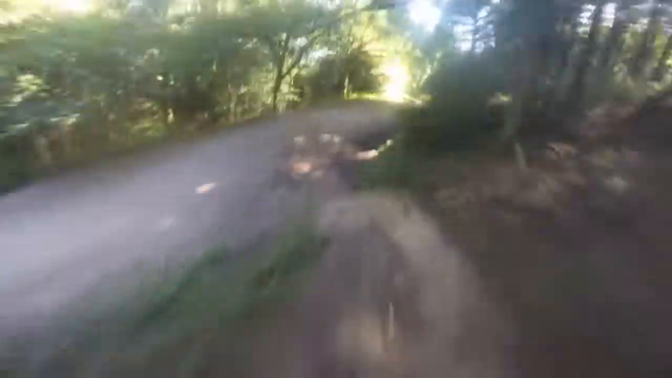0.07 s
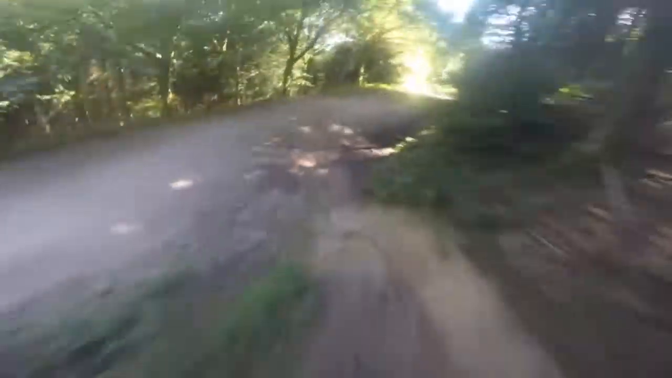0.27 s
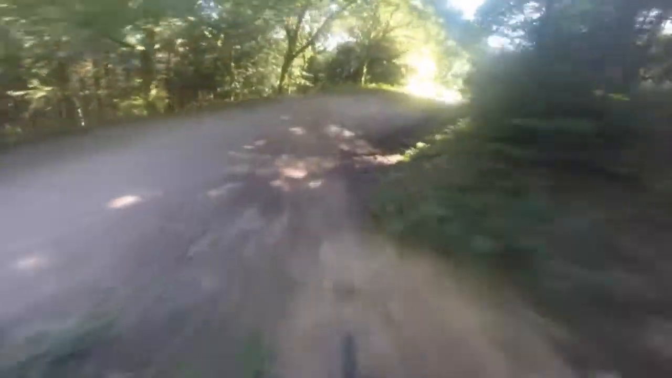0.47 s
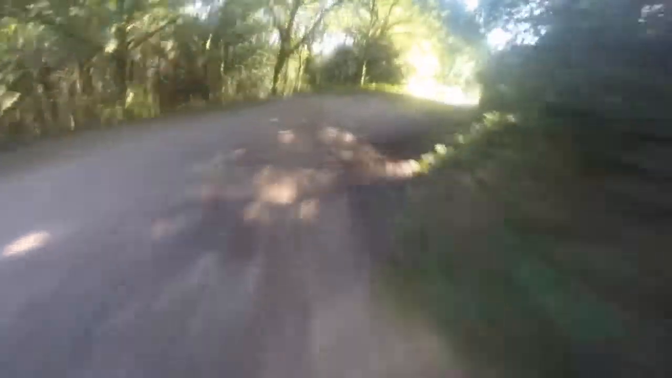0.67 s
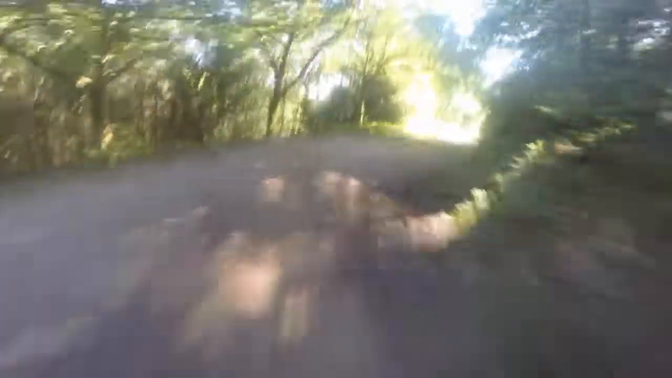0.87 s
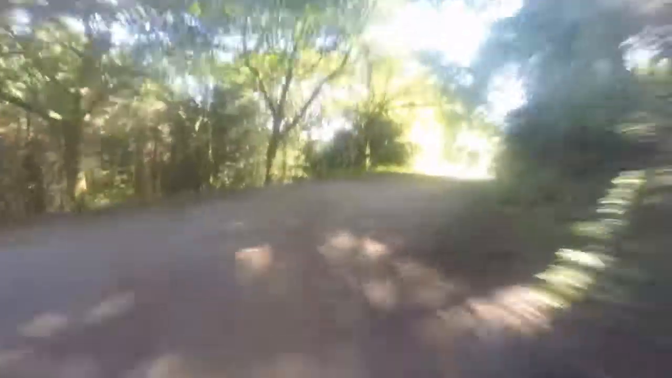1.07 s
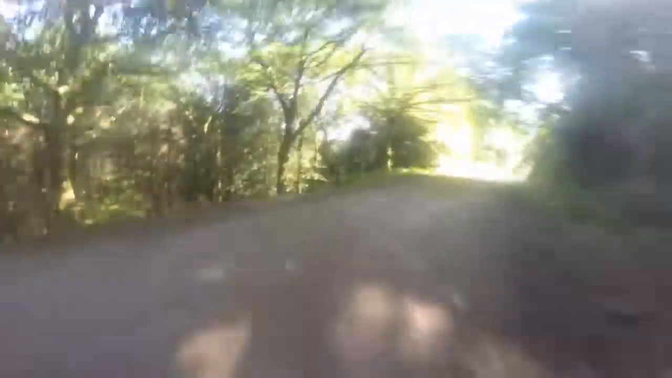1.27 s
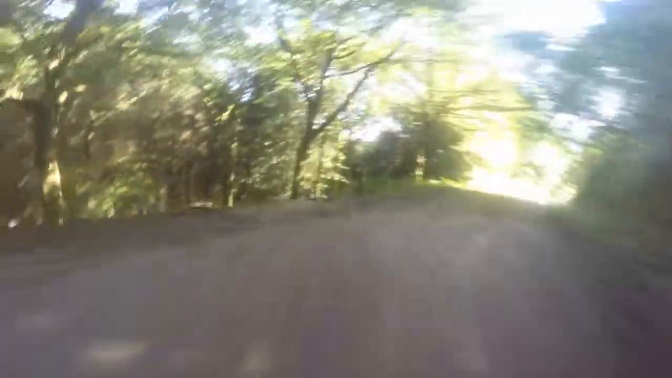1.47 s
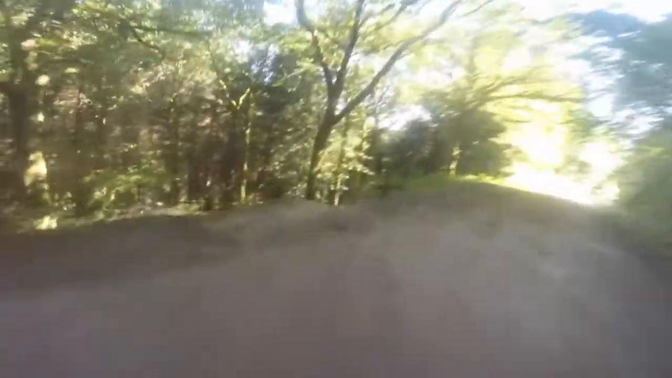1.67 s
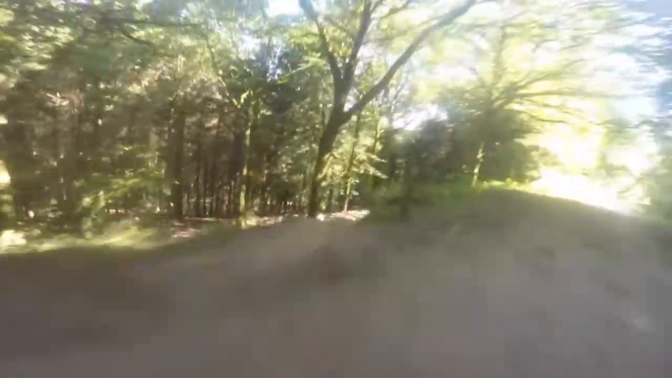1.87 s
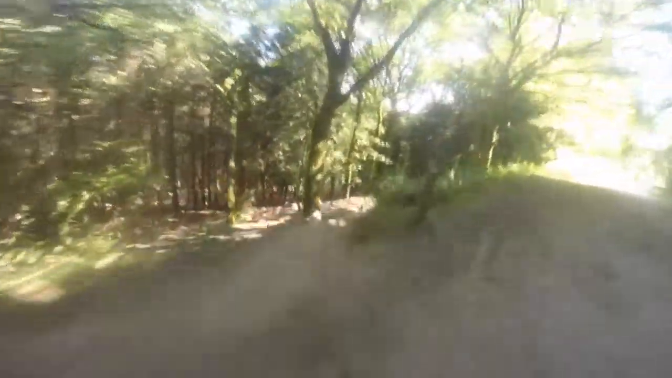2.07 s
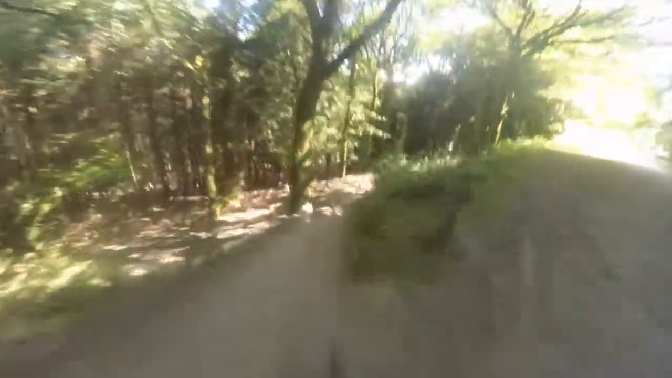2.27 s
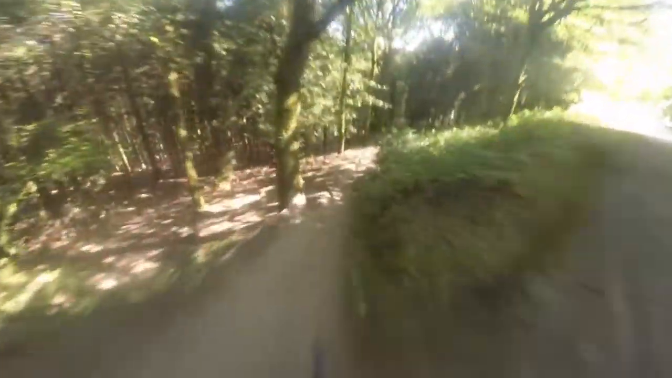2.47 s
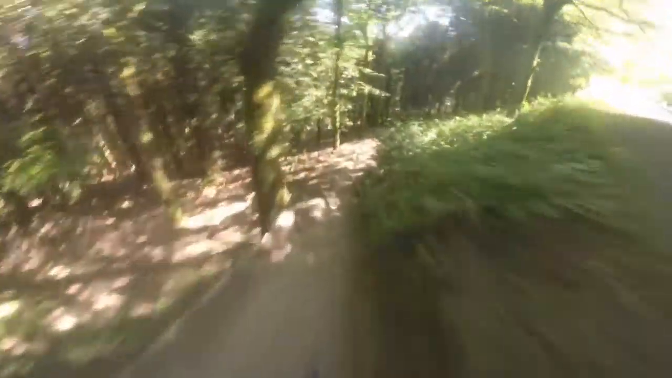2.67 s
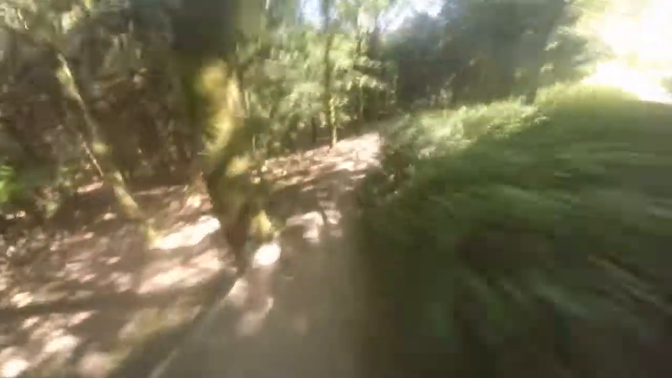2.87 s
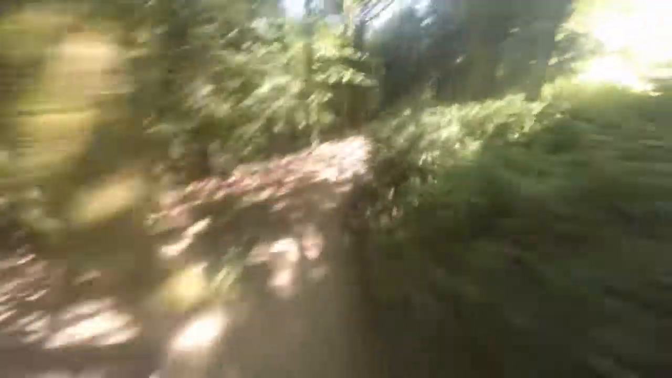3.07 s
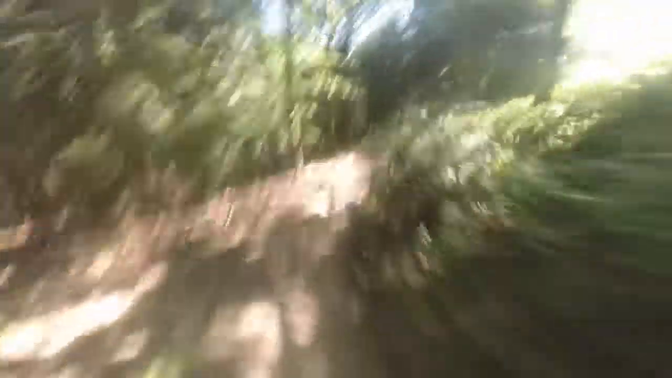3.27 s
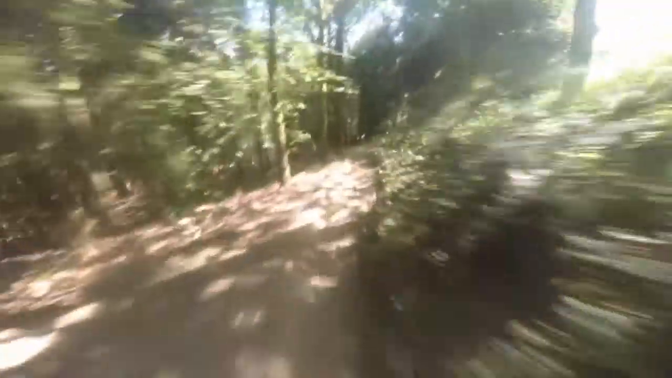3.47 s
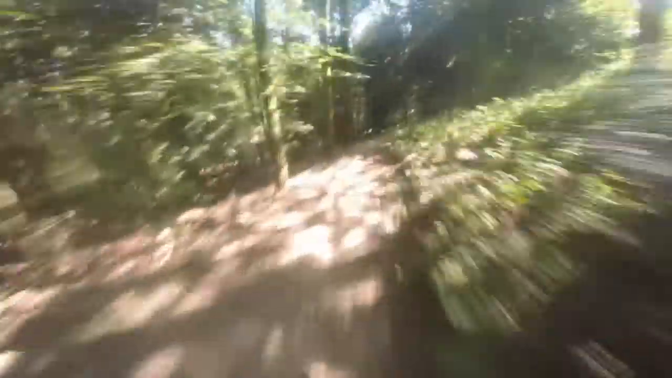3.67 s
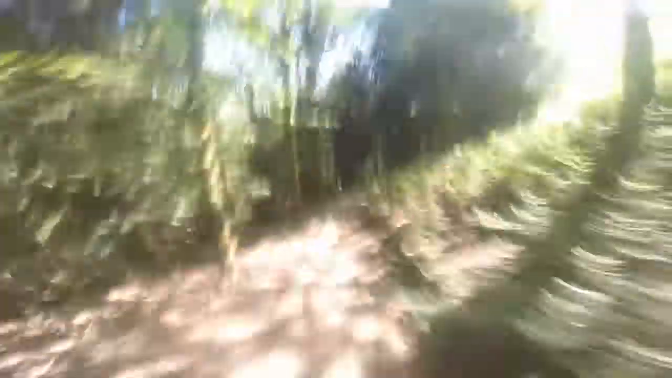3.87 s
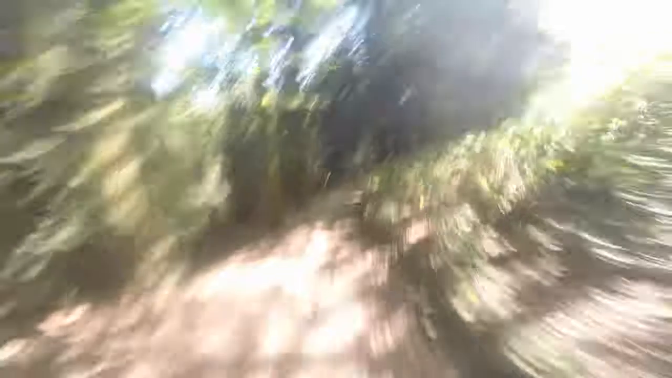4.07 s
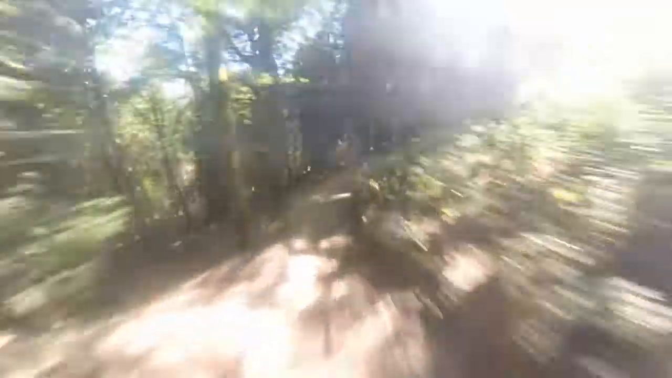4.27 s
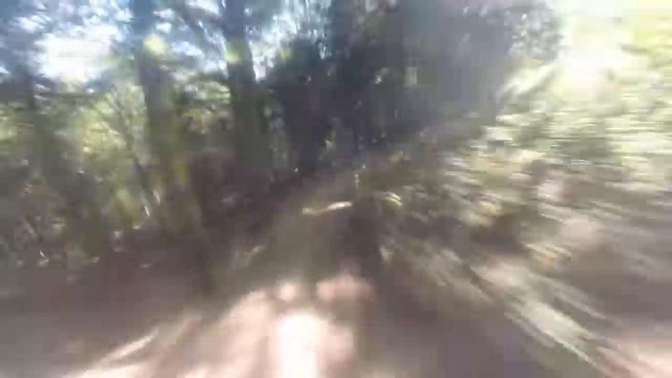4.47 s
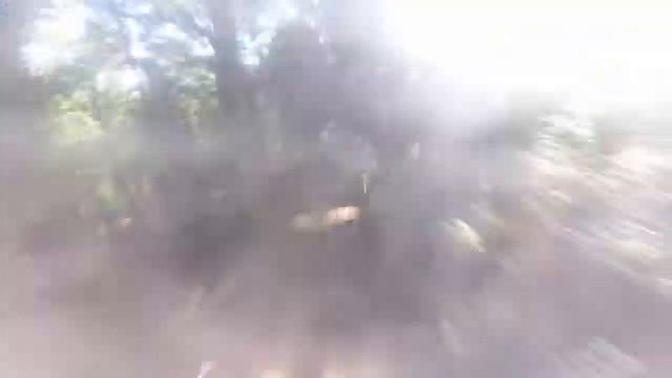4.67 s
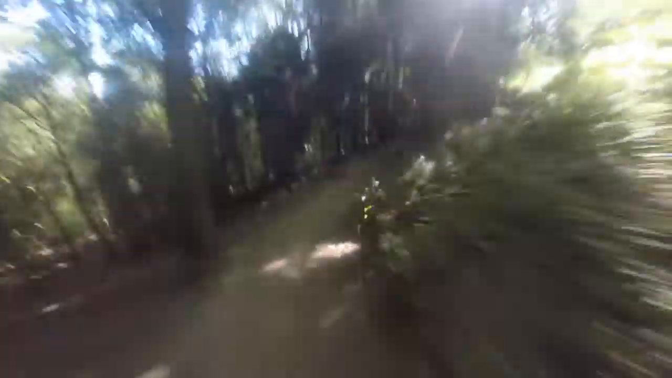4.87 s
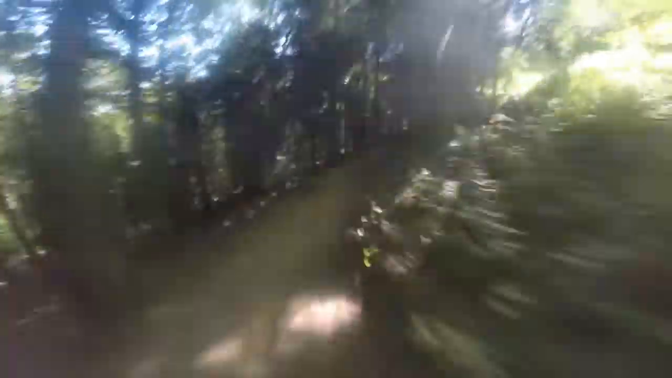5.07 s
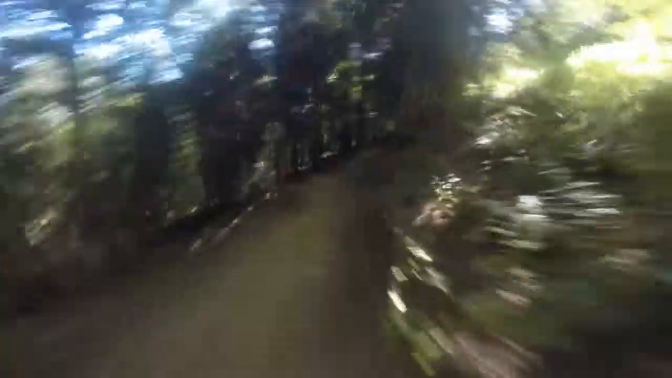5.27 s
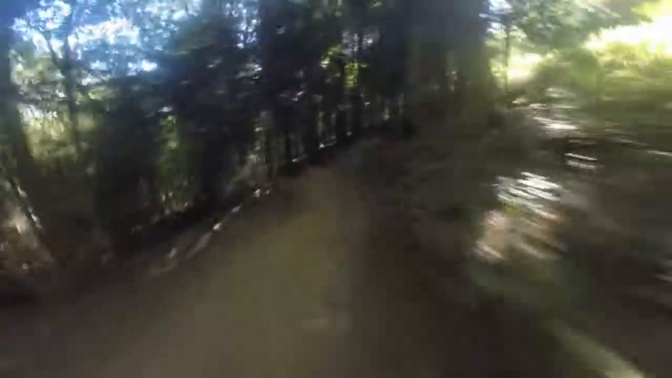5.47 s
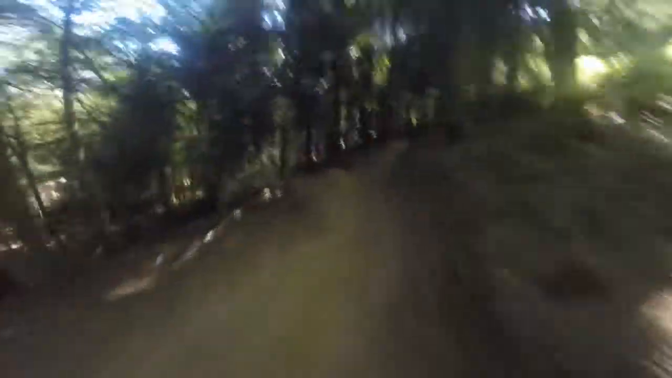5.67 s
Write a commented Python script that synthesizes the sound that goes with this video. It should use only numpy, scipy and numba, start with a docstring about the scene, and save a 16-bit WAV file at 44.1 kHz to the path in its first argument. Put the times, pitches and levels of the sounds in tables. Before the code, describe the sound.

A mountain bike rides fast on a dirt forest trail, heard from a camera in a plastic case on the rider. Tyres crunch and scrub in short slides while deep wind gusts buffet the microphone. After a thud the ground smooths and quietens, a brake rubs faintly, then frame knocks, chain slaps and stronger wind thumps follow.

```python
"""A mountain bike on a dirt forest trail, heard by a camera in a plastic case on the rider.
From the start tyres drone (low noise), crunch and spit grit (random grains) and scrub (resonant grains), while
wind buffets (slow noise and pulses), gears tick, the chain slaps (enveloped grains) and the camera whines (sines).
Jolts thud and a stone ticks, a brake rubs (narrow noise) and the crunch falls quiet on a smooth stretch; then bumps
knock the frame (ringing noise). Crunch, scrub, grit, pebbles, chain, stones and knocks ring in the hollow case."""
import sys
import numpy as np
from scipy import signal
from scipy.fft import rfft, irfft
from scipy.io import wavfile
from scipy.ndimage import uniform_filter1d
from numba import njit

SR = 44100
rng = np.random.default_rng(int(sys.argv[2]) if len(sys.argv) > 2 else 0)


def store_pcm(level_fs):
    """Save levels as 16-bit WAV."""
    pcm = np.round(np.clip(level_fs, -1, 1) * 32767).astype(np.int16)
    wavfile.write(sys.argv[1], SR, np.atleast_2d(pcm).T)


N = 252693
TIME = np.arange(N) / SR
TOP_HZ = 15200  # upper limit of the camera's sound

# resonances and dips of the camera case: centre_hz, width_hz (full width at half the dB), gain_db
CASE_MODES = [(607, 58, 11.5), (1158, 130, 9), (1472, 140, 9.5), (1780, 170, 4), (1985, 80, -5),
              (2120, 130, 6), (2380, 170, 3), (2690, 150, 8), (3380, 220, 3), (3700, 220, -5),
              (4380, 340, 8), (5050, 300, -2), (5750, 450, 3), (6450, 600, 4)]

# crunch of tyres rolling on dirt, before load changes: time_s, level_db
ROLLING = [(0.0, -44.5), (0.7, -44.5), (0.92, -40.5), (1.18, -41), (1.35, -40.3), (2.2, -47), (2.54, -51.5),
           (2.92, -46), (3.29, -44.5), (3.53, -43), (4.2, -43.5), (4.6, -42), (5.15, -43), (5.73, -47.5)]
# grit thrown up by the tread, before load changes: time_s, level_db
GRIT_LEVEL = [(0.0, -61.5), (0.48, -62.5), (0.8, -60), (1.66, -60), (2.44, -69.5), (2.7, -71.5),
              (2.79, -58), (3.0, -63.5), (3.6, -57), (4.96, -58.5), (5.73, -63.5)]
# low drone of wheels and frame, before random sway: time_s, level_db
RUMBLE_LEVEL = [(0, -51), (1.25, -47.5), (2.05, -51.5), (2.7, -55), (3.05, -50.5), (4.2, -49.5), (4.7, -51),
                (5.73, -53)]
# tyres sliding sideways over loose dirt: full_bite_s, level_db, centre_hz, build_s, hold_s, fade_db_per_s
SIDE_SLIDES = [(0.116, -43.5, 2400, 0.11, 0.024, 55), (0.483, -41, 2400, 0.16, .02, 70),
               (0.636, -39.5, 2400, 0.056, .03, 58), (0.792, -37, 2620, .06, 0.034, 102),
               (1.294, -37, 2930, .04, 0.24, 30.5), (3.41, -45, 1900, .07, 0.018, 48),
               (3.855, -45.5, 2370, 0.86, .06, 25), (4.47, -44, 1560, 0.11, 0.027, 45),
               (4.905, -42.5, 1640, 0.094, .02, 114), (5.053, -48.5, 2460, 0.1, 0.38, 32)]
SLIDE_SAG_OCT_PER_S = 0.69  # the scrub gets duller as a slide loses speed
SCRUB_WIDTH_HZ = 760
# spectra of the tyre sounds, the first three before the case: frequency_hz, gain_db
CRUNCH_SPECTRUM = [(150, -30.5), (400, -0.5), (700, -2), (1000, 1), (1600, 0), (2400, -4.5), (3200, -11),
                   (4500, -21.5), (7000, -39.5), (10000, -33.5), (15000, -58)]
SCRUB_SPECTRUM = [(400, -7), (1500, 7), (3000, -0.5), (3900, 1), (4500, -32), (6000, -3.5), (7500, -31),
                  (9200, -19), (10300, -29), (15000, -40)]
GRIT_SPECTRUM = [(1000, 8), (2500, 4.5), (4000, 5.5), (5200, 4), (6500, -1), (7500, -7), (9500, -13),
                 (10800, -16), (12400, -6), (13500, -28), (15000, -51)]
RUMBLE_SPECTRUM = [(30, -4.5), (60, -2), (85, 14.5), (108, 14.5), (125, 8), (145, 1), (200, -2.5),
                   (250, -0.5), (330, -6), (500, -20.5), (1200, -36.5), (6000, -81)]

# spectrum of cracking pebbles before the case: frequency_hz, gain_db
PEBBLE_SPECTRUM = [(600, -1.5), (1500, 12), (3000, 14.5), (5000, -15), (6600, 1), (9000, -6), (12500, -22),
                   (15000, -9)]
PEBBLES_OVER_GRIT_DB = -10

# steady air flow over the case: time_s, level_db
STEADY_FLOW = [(0, -32.5), (.85, -36.5), (1.25, -31), (1.85, -43.5), (2.55, -45), (2.85, -33.5),
               (3.3, -32.5), (3.6, -18), (3.95, -24.5), (4.22, -22), (4.35, -35), (4.58, -36), (4.8, -23.5),
               (5.1, -28.5), (5.45, -23), (5.55, -37), (5.73, -22)]
# gusts as the rider pitches over bumps: crest_s, level_db, spread_ms (standard deviation of the bell)
BUMP_GUSTS = [(.145, -20, 25), (.73, -25, 23), (.92, -19.5, 38), (1.0, -14, 34), (1.16, -24, 19),
              (1.35, -21.5, 27), (2.98, -20, 28), (3.08, -21, 22), (3.2, -22, 36), (3.36, -20.5, 21),
              (3.47, -23.5, 38), (3.9, -15, 32), (4.469, -24.5, 37), (4.67, -22, 37), (4.87, -19, 15),
              (5.62, -17, 10.5)]
# single gusts that thump the microphone: start_s, pulse_db (before colouring), rise_ms
THUMPS = [(0.925, -2, 10.6), (0.956, -1, 7.9), (1.004, -5.5, 4.6), (3.166, -5.5, 7.2), (3.638, -2, 5.7),
          (3.67, -7, 6.4), (3.726, -6.5, 5.4), (3.866, -24, 7.8), (3.961, 0.5, 7.7), (4.031, 0, 5),
          (4.151, 0.5, 6.4), (4.682, 3, 15.6), (4.736, -0.5, 8.6), (5.609, -3, 8.3)]
# spectra of the eddies and of the thumps: frequency_hz, gain_db
EDDY_SPECTRUM = [(6, 0.5), (12, 5), (24, 1.5), (40, -14), (60, -15), (90, -23), (130, -35.5), (200, -56.5),
                 (500, -67), (2000, -100), (15000, -150)]
THUMP_SPECTRUM = [(8, -19), (25, -2), (60, 0), (95, 1.5), (140, -15.5), (250, -11), (600, -1.5), (3000, 10)]

# the drivetrain ticking over: time_s, level_db, mean_ticks_per_s
DRIVE_TICKS = [(0, -83, 26), (.4, -70, 26), (1, -66, 19), (1.65, -69, 30), (2.15, -73.5, 32),
               (2.5, -73, 24), (2.9, -77.5, 44), (5.73, -72, 31)]
# spectrum of the drivetrain: frequency_hz, gain_db
DRIVE_SPECTRUM = [(2000, -20), (5000, -8), (6600, 0), (7600, -3), (8400, -6), (9200, -2), (10300, -20),
                  (15000, -38)]

# faint whine of the camera's electronics: pitch_hz, level_db
WHINE_TONES = [(5846, -77), (11712, -78.5), (14626, -88)]

# the chain thrown against the frame: start_s, first_slap_db, loss_db (per rebound)
CHAIN_SLAPS = [(.122, -46.5, 7), (.5775, -47, 12), (.8579, -48.5, 12), (0.9323, -41.5, 12),
               (.967, -42.5, 5.5), (3.0789, -47, 19), (3.1915, -47.5, 5), (3.3135, -41, 20),
               (3.3724, -44, 14), (3.497, -48, 1), (3.647, -39.5, 17), (3.7439, -50, 18), (3.77, -36.5, 5),
               (3.891, -44.5, 24), (3.965, -46, 18), (4.063, -46, 16), (4.088, -40, 11), (4.171, -46, 16),
               (4.2585, -41.5, 23), (4.2837, -45, 22), (4.366, -47, 18), (4.445, -48, 18),
               (4.7466, -47, 15), (4.805, -44, 18), (5.06, -49, 14), (5.415, -43.5, 11), (5.4758, -42, 26),
               (5.684, -39.5, 22)]
REBOUND_S, SLAP_RISE_MS = 0.022, 6.5
# rough stretches where the chain also jiggles lightly: start_s, end_s
ROUGH_STRETCHES = [(.1, .25), (3.3, 7.6)]
JIGGLES_PER_S, JIGGLE_DB, JIGGLE_SPREAD_DB = 12, -55.5, 1
# ring of the links: usual centre, its scatter, width, strength beside the plain clatter
LINK_RING_HZ, LINK_SCATTER_OCT, LINK_WIDTH_HZ, LINK_RING_DB = 5300, 0.43, 1800, 0.5
# spectrum of the chain before the case: frequency_hz, gain_db
CHAIN_SPECTRUM = [(500, -5.5), (1500, 4.5), (3000, 9.5), (5000, 4), (8000, -3), (10000, -4.5), (12500, -9),
                  (15000, -23)]

# hard jolts that thud through the camera mount: start_s, pulse_db (before colouring), rise_ms
MOUNT_JOLTS = [(1.005, -15.5, 0.79), (4.032, -19.5, 1.5)]
# spectrum of the jolts: frequency_hz, gain_db
JOLT_SPECTRUM = [(40, -21), (160, -0.5), (600, -0.5), (1500, -28), (8000, -56)]

# stones ticking off the bike: start_s, strike_db (before colouring)
STONE_TICKS = [(1.1884, -32), (2.9632, -27), (3.048, -28.5)]
# spectrum of a stone before the case: frequency_hz, gain_db
STONE_SPECTRUM = [(1000, -6), (3000, -4), (4800, 0.5), (5800, -9.5), (8000, -3.5), (10000, -20),
                  (12000, -14), (15000, -37)]

# a brake pad rubbing briefly: time_s, level_db, pitch_hz
BRAKE_RUB = [(1.8, -90, 1480), (1.92, -52, 1470), (2.08, -59, 1470), (2.14, -43, 1500), (2.23, -45, 1476),
             (2.28, -69, 1500), (2.4, -90, 1500)]

# frame and fork knocking over bumps: start_s, strike_db (before ringing and colouring), ring_hz, length_ms
FRAME_KNOCKS = [(2.760, -32.5, 1980, 34), (2.816, -31, 1320, 19), (2.821, -37, 796, 28),
                (2.824, -30, 2500, 11), (2.874, -37, 1770, 36), (2.887, -33.5, 790, 21),
                (2.926, -35.5, 2200, 10), (3.104, -34.5, 1380, 7.4), (3.18, -33.5, 1400, 11),
                (3.307, -24.5, 2440, 6.4), (3.495, -29, 2180, 12), (3.771, -24, 1950, 9.3),
                (3.893, -35, 2530, 17), (5.264, -30, 1330, 6.1)]
# spectrum of the knocks before the case: frequency_hz, gain_db
KNOCK_SPECTRUM = [(200, -12), (700, 7), (2500, 10), (4000, 2.5), (7000, -81), (15000, -62)]
KNOCK_WIDTH_HZ = 160


def undb(db):
    """Decibels to amplitude ratio."""
    return 10 ** (np.asarray(db) / 20)


def curves(table):
    """Linear interpolation: each column of a table joined by straight lines in time."""
    s, *columns = np.transpose(table)
    return [np.interp(TIME, s, c) for c in columns]


def walk(rate):
    """Band-limited random modulation: levels held 1 / rate s, smoothed as long; spread 1."""
    k = max(int(SR / rate), 1)
    held = rng.standard_normal(N)[np.arange(N) // k]
    smooth = uniform_filter1d(held, k)
    return smooth / smooth.std()


def colour(x, points, modes=(), size=16384):
    """Minimum-phase filtering: a smooth spectrum with resonant peaks and dips, made causal by its cepstrum."""
    hz = np.maximum(np.arange(size // 2 + 1) * SR / size, 1)
    point_hz, point_db = np.transpose(points)
    db = np.interp(np.log(hz), np.log(point_hz), point_db)
    db = db + sum(gain / (1 + (2 * (hz - centre) / width) ** 2) for centre, width, gain in modes)
    cepstrum = irfft(np.log(undb(db)))[:size // 2]
    cepstrum[1:] *= 2  # fold the negative times onto the positive ones
    impulse_response = irfft(np.exp(rfft(cepstrum, size)))
    return signal.fftconvolve(x, impulse_response)[:len(x)]


def unit(x, band):
    """Energy normalisation by Parseval's theorem: rms 1 within a band in Hz."""
    lo, hi = (int(f * len(x) / SR) for f in band)
    band_energy = np.sum(np.abs(rfft(x)[lo:hi]) ** 2)
    return x * len(x) / np.sqrt(2 * band_energy)


@njit
def resonate(x, hz, width):
    """Simple resonance: a state-variable band-pass whose centre may move, gain 1 at the centre."""
    y, band, low = np.empty(len(x)), 0., 0.
    for i in range(len(x)):
        g, damping = np.tan(np.pi * hz[i] / SR), width / hz[i]
        v = (band + g * (x[i] - low)) / (1 + g * (g + damping))
        band, low, y[i] = 2 * v - band, low + 2 * g * v, damping * v
    return y


def grains(rate, spread_db):
    """Shot noise: tiny impacts at random moments, rate per s, with scattered sizes; rms 1."""
    hits = rng.random(N) < rate / SR
    sizes = undb(spread_db * rng.standard_normal(N))
    x = hits * rng.choice([-1, 1], N) * sizes
    return x / x.std()


def swell(s, rise_ms):
    """Impulsive envelope: a quick smooth rise to 1 and a slower fall, starting at time s."""
    out, start = np.zeros(N), int(s * SR)
    u = np.arange(min(N - start, SR // 5)) / SR * 1000 / rise_ms
    out[start:start + len(u)] = (u * np.exp(1 - u)) ** 2
    return out


def slides():
    """Sliding friction: level and centre of the scrub as each slide builds up, holds and fades while its pitch sags."""
    power, weighted_hz = 1e-18, 2000e-18  # a silent floor at 2000 Hz
    for s, db, hz, build_s, hold_s, fade_db in SIDE_SLIDES:
        age = TIME - s
        fading_db = db - fade_db * np.maximum(age - hold_s, 0)
        bite = np.clip(1 + age / build_s, 0, 1) * undb(fading_db)
        sagging_hz = hz * 2 ** (-SLIDE_SAG_OCT_PER_S * np.clip(age, 0, 1))
        power = power + bite ** 2
        weighted_hz = weighted_hz + bite ** 2 * sagging_hz
    # overlapping slides share one centre, weighted by power
    return 10 * np.log10(power), weighted_hz / power


def tyres():
    """Granular contact noise: the tread crushes dirt, scrubs it and flings grit; the wheels drone underneath."""
    (roll_db,), (grit_db,), (rumble_db,) = curves(ROLLING), curves(GRIT_LEVEL), curves(RUMBLE_LEVEL)
    scrub_db, scrub_hz = slides()
    load = walk(rate=35)  # uneven ground presses the tyre harder and softer
    crunch = colour(grains(rate=4000, spread_db=3.5), CRUNCH_SPECTRUM, CASE_MODES)
    crunch = unit(crunch, band=(500, 1700))
    # the knobs grip and slip, so the pitch of the scrub wanders
    slip_hz = scrub_hz * (1 + .05 * walk(rate=22))
    scrub = resonate(grains(rate=6000, spread_db=1.5), slip_hz, float(SCRUB_WIDTH_HZ))
    scrub = unit(colour(scrub, SCRUB_SPECTRUM, CASE_MODES), band=(1200, 3600))
    grit = colour(grains(rate=3500, spread_db=2.5), GRIT_SPECTRUM, CASE_MODES)
    grit = unit(grit, band=(4000, 7000))
    rumble = unit(colour(rng.standard_normal(N), RUMBLE_SPECTRUM), band=(160, 400))
    return (crunch * undb(roll_db + load)
            + scrub * undb(scrub_db + 0.33 * load)
            + grit * undb(grit_db + 2 * load)
            + rumble * undb(rumble_db + 1.15 * walk(rate=14)))


def gravel():
    """Brittle impact noise: loose pebbles crack under the tread, more loudly where more grit flies."""
    pebbles = grains(rate=90, spread_db=4)
    age_ms = np.arange(SR // 60) * 1000 / SR
    crack = signal.fftconvolve(np.abs(pebbles), np.exp(-age_ms / 6.2))[:N]
    clicks = colour(crack * rng.standard_normal(N), PEBBLE_SPECTRUM, CASE_MODES)
    clicks = unit(clicks, band=(4000, 7000))
    return clicks * undb(curves(GRIT_LEVEL)[0] + PEBBLES_OVER_GRIT_DB)


def wind():
    """Turbulent pressure: eddies roll over the microphone, swelling in gusts; single gusts land as thumps."""
    ceiling = .85
    eddies = colour(rng.standard_normal(N), EDDY_SPECTRUM)
    # level out chance swells, so that the flow sets the strength of the eddies
    eddies = eddies / np.sqrt(uniform_filter1d(eddies ** 2, size=3500))
    gusts = sum(undb(db) * np.exp(-((TIME - s) * 1000 / ms) ** 2 / 2) for s, db, ms in BUMP_GUSTS)
    flow = np.hypot(undb(curves(STEADY_FLOW)[0]), gusts)
    pulses = sum(undb(db) * swell(s, ms) for s, db, ms in THUMPS)
    thumps = colour(pulses, THUMP_SPECTRUM)
    pressure = unit(eddies, band=(20, 80)) * flow + thumps
    # the biggest pressure swings are rounded off
    return pressure / (1 + (pressure / ceiling) ** 4) ** (1 / 4)


def drivetrain():
    """Repeated impact: small steel parts tick softly at an uneven pace and strength over a steady hiss."""
    db, rate = curves(DRIVE_TICKS)
    pace = rate * (1 + .14 * walk(rate=25))
    strength = undb(2 * walk(rate=30))
    phase = np.cumsum(pace) / SR % 1
    envelope = strength * np.exp(-phase / 0.29) + 0.67
    ticks = colour(rng.standard_normal(N) * envelope, DRIVE_SPECTRUM)
    return undb(db) * ticks / ticks.std()


def whine():
    """Phase modulation: thin sine tones from the camera itself waver at random."""
    out = np.zeros(N)
    for hz, db in WHINE_TONES:
        wavering_phase = 2 * np.pi * hz * TIME + .7 * walk(rate=48)
        out += np.sqrt(2) * undb(db) * np.sin(wavering_phase)  # level is rms
    return out


def slaps(s, db, loss_db, count):
    """Inelastic rebound: the chain hits and rebounds at a steady pace, weaker each time."""
    return sum(undb(db - k * loss_db) * swell(s + k * REBOUND_S, SLAP_RISE_MS) for k in range(count))


def chain():
    """Multiple impact: slaps are flurries of link hits with a wandering ring; rough ground adds random jiggles."""
    shake = sum(slaps(s, db, loss_db, count=4) for s, db, loss_db in CHAIN_SLAPS)
    rough = sum((TIME > start) & (TIME < end) for start, end in ROUGH_STRETCHES)
    moments = rng.random(N) < JIGGLES_PER_S / SR
    jiggles = rough * moments * undb(JIGGLE_DB + JIGGLE_SPREAD_DB * rng.standard_normal(N))
    jiggles = signal.fftconvolve(jiggles, swell(0, SLAP_RISE_MS))[:N]
    links = colour(grains(rate=1600, spread_db=0.5), CHAIN_SPECTRUM, CASE_MODES)
    ring_hz = np.minimum(LINK_RING_HZ * 2 ** (LINK_SCATTER_OCT * walk(rate=40)), TOP_HZ)
    ring = resonate(links, ring_hz, float(LINK_WIDTH_HZ))
    links = unit(links + undb(LINK_RING_DB) * ring, band=(3500, 14000))
    return links * np.hypot(shake, jiggles)


def jolts():
    """Impulse response: one short push each, with the slowest part weakened, gives a dull thud."""
    push = sum(undb(db) * swell(s, ms) for s, db, ms in MOUNT_JOLTS)
    return colour(push, JOLT_SPECTRUM)


def stones():
    """Brief contact: a stone's short noise burst spreads over the spectrum as one bright, dry tick."""
    strikes = sum(undb(db) * swell(s, rise_ms=0.86) for s, db in STONE_TICKS)
    return colour(strikes * rng.standard_normal(N), STONE_SPECTRUM, CASE_MODES)


def brake():
    """Friction-driven resonance: the noise of the pad excites one narrow ring of the disc."""
    db, hz = curves(BRAKE_RUB)
    rubbing = rng.standard_normal(N)
    ring = resonate(resonate(rubbing, hz, 100.0), hz, 100.0)
    return undb(db) * ring / ring.std()


def knocks():
    """Struck resonance: parts clatter against their stops, and each bump rings one pitch most."""
    out = np.zeros(N)
    for s, db, hz, ms in FRAME_KNOCKS:
        clatter = rng.standard_normal(N) * swell(s, ms * 0.38)
        ring = resonate(clatter, np.full(N, float(hz)), float(KNOCK_WIDTH_HZ))
        out += undb(db) * (ring + 0.19 * clatter)
    return colour(out, KNOCK_SPECTRUM, CASE_MODES)


def scene():
    """Superposition: bike, wind and camera add up in one channel."""
    bike = tyres() + gravel() + drivetrain() + chain() + jolts() + stones() + brake() + knocks()
    return (bike + wind() + whine())[None]


def record(dry):
    """Band limitation: the camera cuts the top with a steep elliptic low-pass."""
    return signal.sosfilt(signal.ellip(10, .2, 80, TOP_HZ, fs=SR, output="sos"), dry)


dry = scene()
out = record(dry)
store_pcm(out)
```